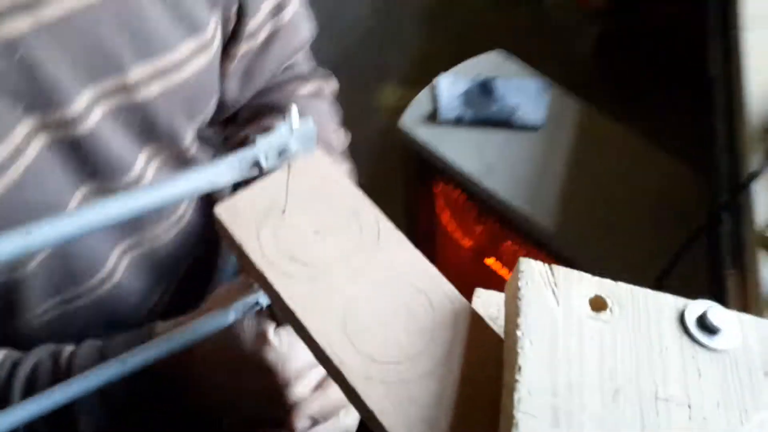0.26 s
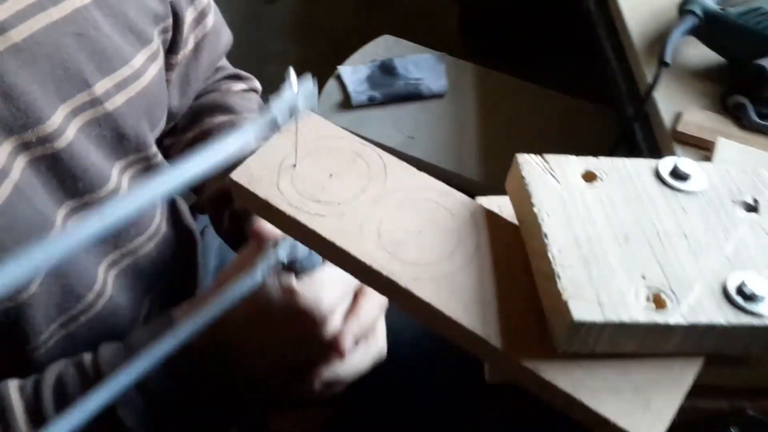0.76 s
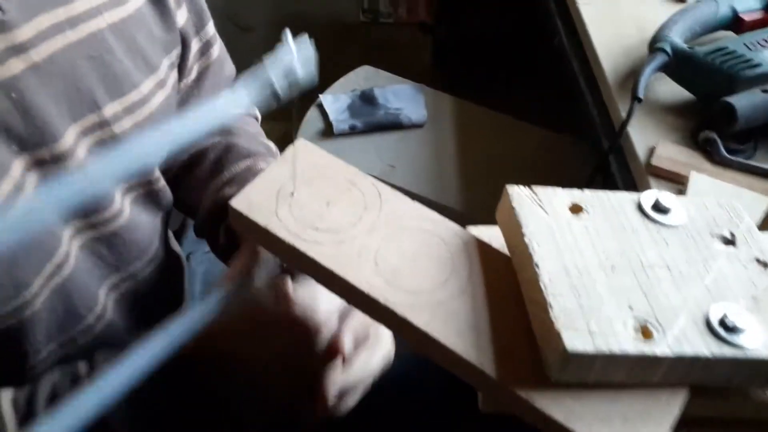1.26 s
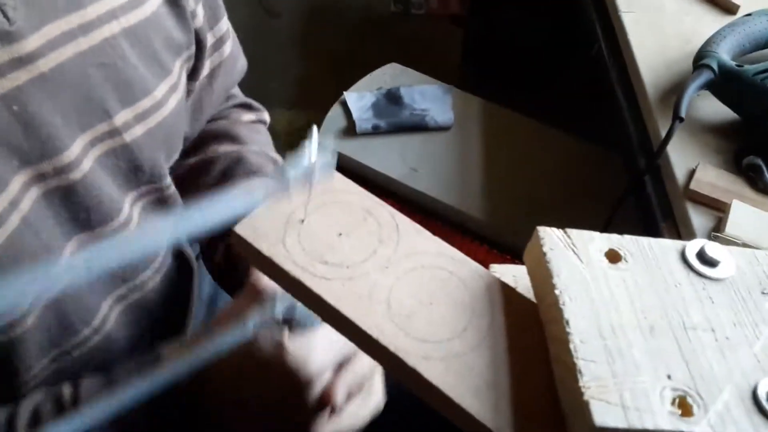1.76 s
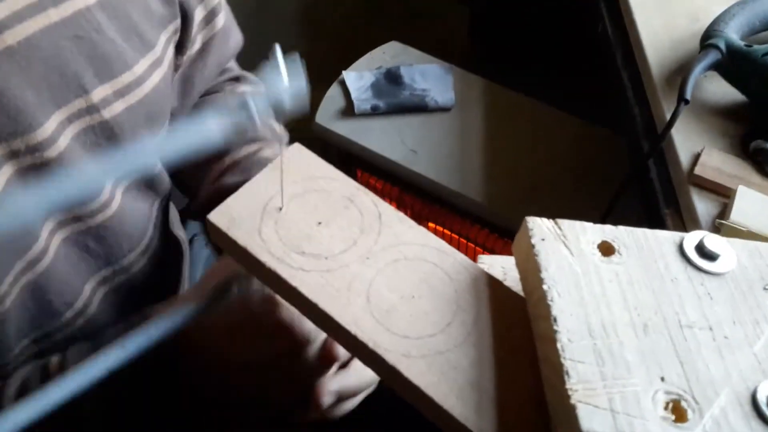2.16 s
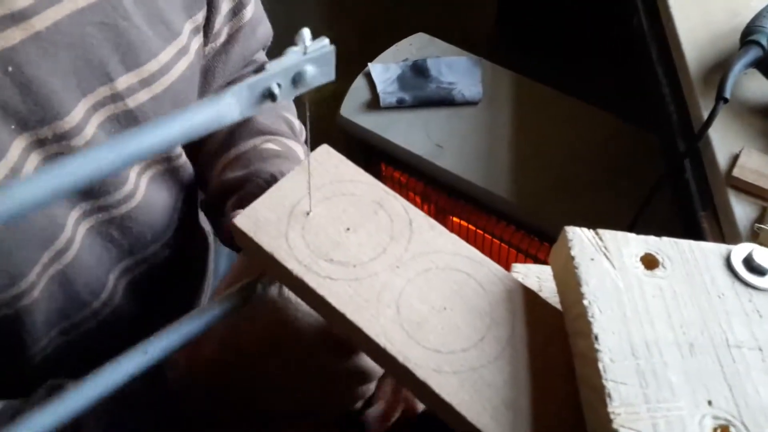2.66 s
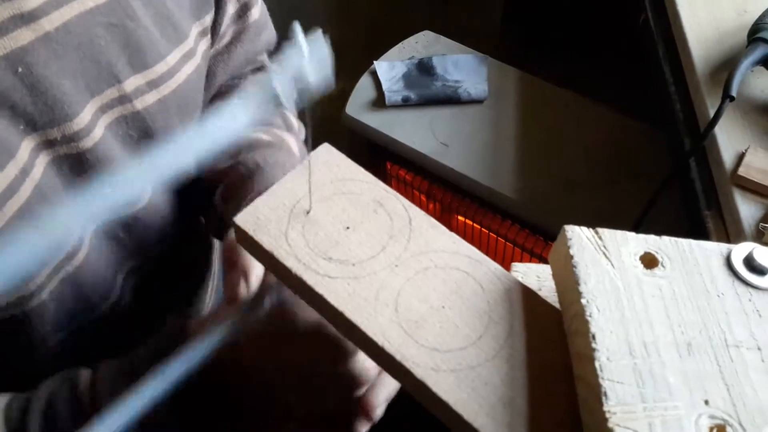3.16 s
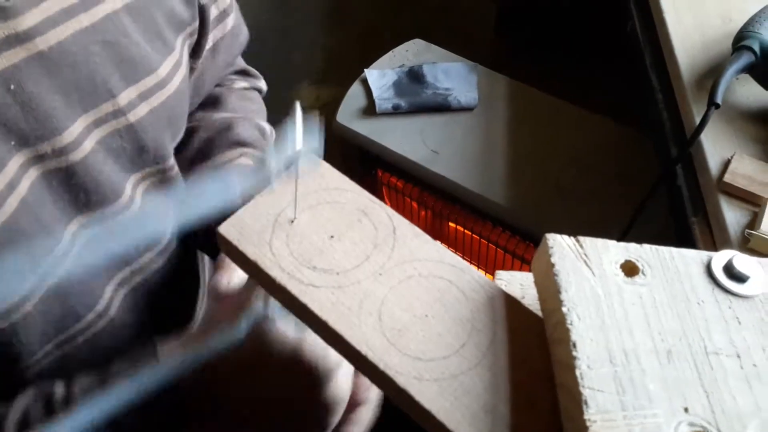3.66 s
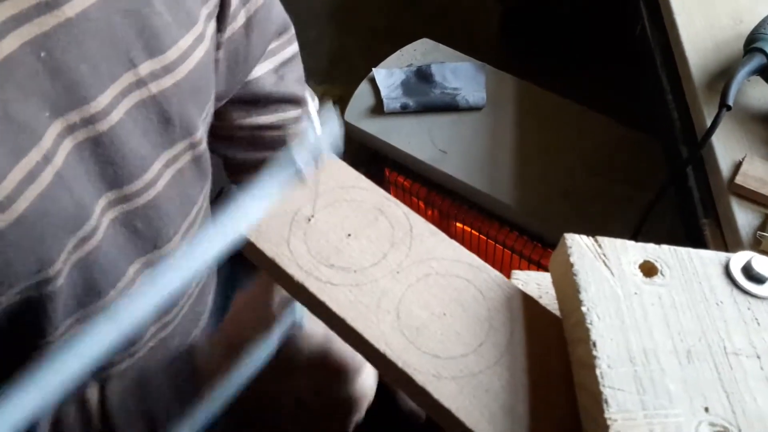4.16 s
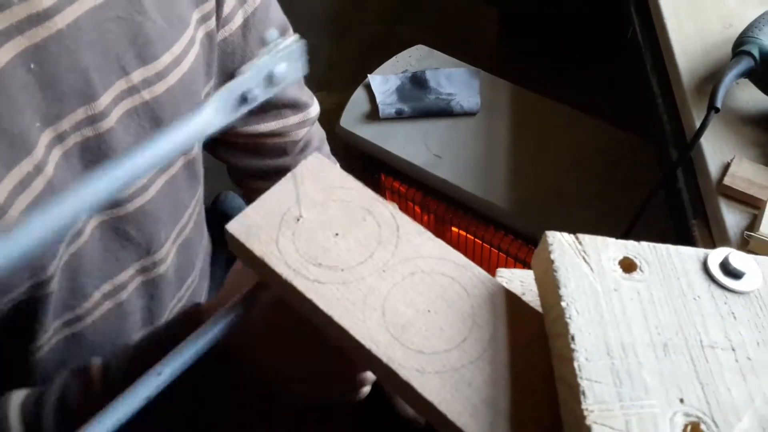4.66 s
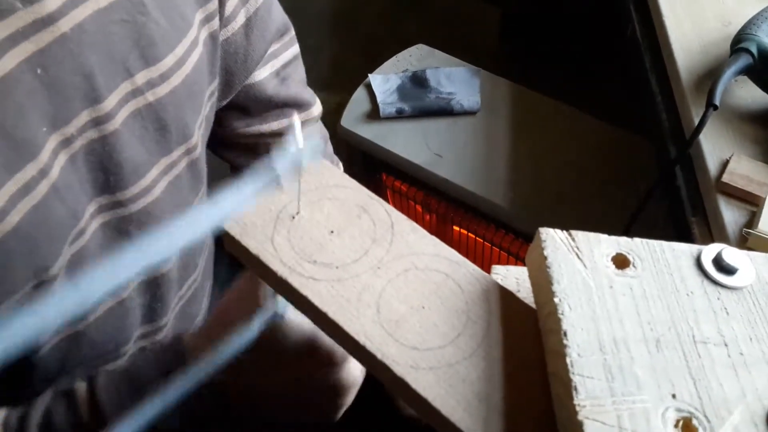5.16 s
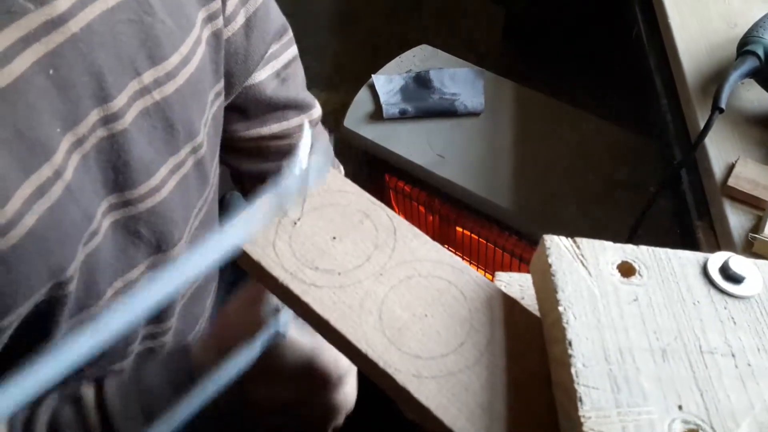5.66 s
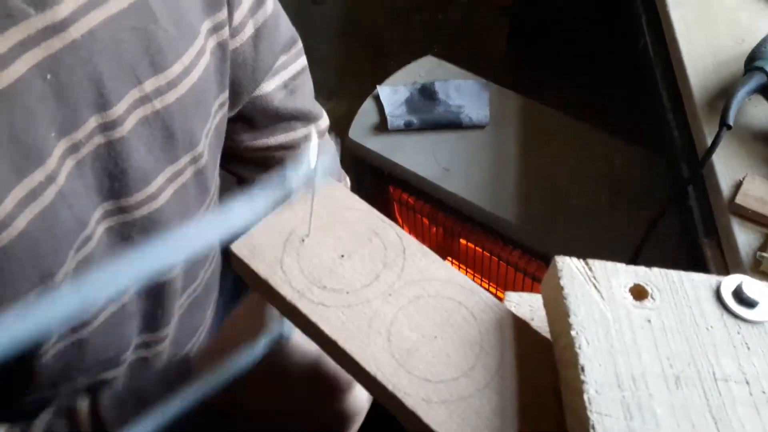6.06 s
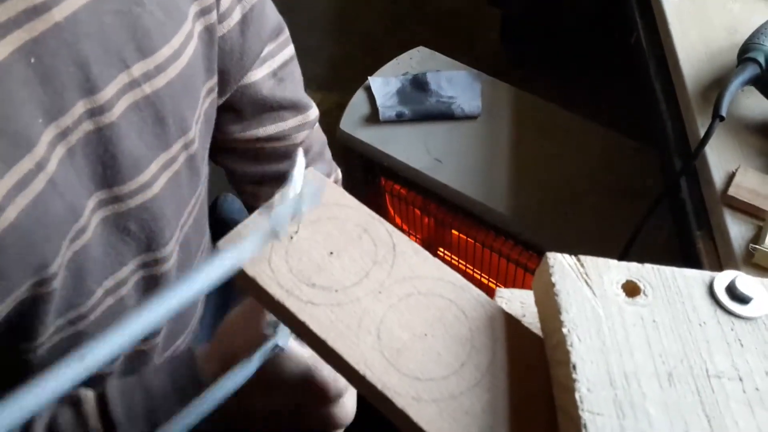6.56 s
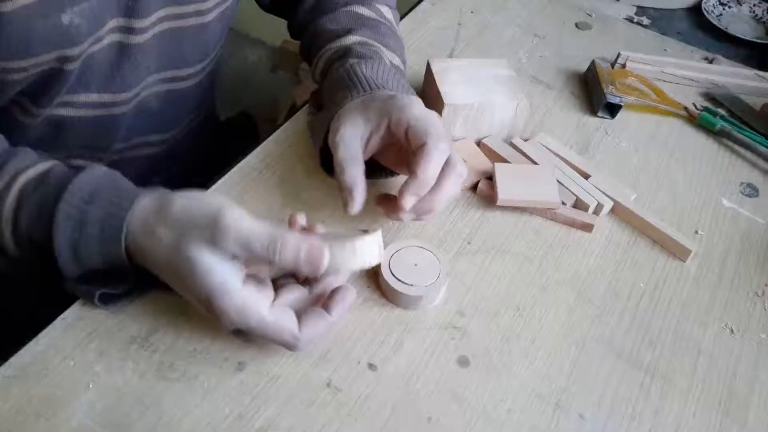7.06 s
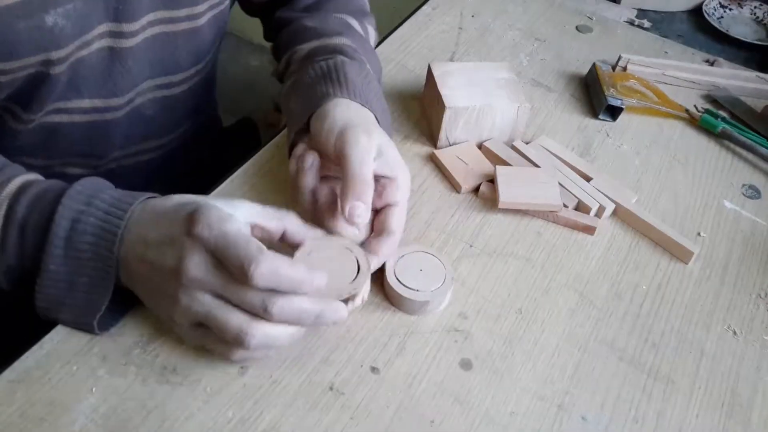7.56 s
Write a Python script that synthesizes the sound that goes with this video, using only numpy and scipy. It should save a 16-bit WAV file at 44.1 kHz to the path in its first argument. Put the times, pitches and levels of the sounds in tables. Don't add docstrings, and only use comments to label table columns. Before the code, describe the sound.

Close, fairly dry sound of a fine-toothed handsaw in thin board clamped to a bench: a quiet low bump and rustle first, then about three double strokes per second, gritty and mid-bright with a metallic whizz and low bench rumble. Occasional knocks and brief toothy tones break the rhythm. The sawing ends abruptly, followed by near silence and a faint room with tiny part clicks.

```python
import sys
import numpy as np
from scipy import signal
from scipy.io import wavfile
from scipy.ndimage import uniform_filter1d

SR = 44100
rng = np.random.default_rng(int(sys.argv[2]) if len(sys.argv) > 2 else 0)


def invert_db(level):
    return 10 ** (np.asarray(level, dtype=float) / 20)


def int16_out(signal):
    q = np.round(np.clip(np.atleast_2d(signal).T, -1, 1) * 32767)
    wavfile.write(sys.argv[1], SR, q.astype(np.int16))


N = 343891
T = np.arange(N) / SR

# start_s, length_s, bite_db, speed_db
CUTS = [(0.455, 0.1, -48, -88), (0.879, 0.24, -33.0, -53.5), (1.212, 0.19, -31.0, -51.5),
        (1.56, 0.18, -30.0, -48.5), (1.881, 0.19, -28, -46.5), (2.224, 0.19, -28.5, -45.5),
        (2.552, 0.18, -26.5, -44.5), (3.11, 0.19, -27.0, -48), (3.453, 0.18, -29, -43.5),
        (3.783, 0.17, -27.5, -41), (4.075, 0.22, -28.0, -44.5), (4.408, 0.18, -29.5, -44),
        (4.716, 0.16, -28.5, -45), (5.006, 0.172, -26.5, -44.5), (5.304, 0.17, -29.0, -44.5),
        (5.588, 0.17, -31.0, -45), (5.88, 0.18, -27, -41.5), (6.183, 0.18, -27.5, -42.5),
        (6.468, 0.2, -30.5, -45.5), (6.786, 0.16, -27.5, -44)]
# start_s, length_s, bite_db, speed_db
RETURNS = [(0.669, 0.24, -41.5, -75.5), (0.967, 0.307, -42.0, -58), (1.331, 0.25, -40, -59.5),
           (1.658, 0.25, -41.0, -55.5), (1.967, 0.3, -37, -55.5), (2.349, 0.21, -38, -50),
           (2.673, 0.25, -35.0, -52), (3.222, 0.27, -38.0, -53.5), (3.579, 0.208, -35, -51),
           (3.809, 0.26, -50.0, -59.5), (4.231, 0.19, -36.5, -51.5), (4.514, 0.2, -34.5, -55.0),
           (4.826, 0.17, -36, -51), (5.116, 0.205, -39, -50), (5.409, 0.2, -33.5, -51.5),
           (5.699, 0.22, -34, -55), (6.008, 0.18, -35.0, -47.5), (6.307, 0.2, -39, -48),
           (6.61, 0.16, -32.0, -50), (6.9, 0.19, -33.5, -49.0)]
# time_s, level_db
BOARD_LOOSENESS = [(.49, -47), (.5, -35), (.54, -33), (.6, -47), (.74, -44), (.77, -32), (1.0, -34.5),
                   (1.4, -33.5), (1.85, -38.5), (2.05, -34.5), (2.75, -32.5), (2.92, -36), (3.09, -56),
                   (3.16, -32), (4.0, -36.5), (4.3, -34), (5.2, -36.5), (6.3, -32.5)]
# pitch_hz, width_hz, level_db
BENCH_MODES = [(65, 13, -16), (77.3, 6, 12), (103, 160, 4)]
# pitch_hz, width_hz, level_db
BOARD_MODES = [(145.4, 44, 0), (159.6, 30, -0.5), (200, 26, 1), (230, 18, 2), (288, 20.7, -0.5),
               (359.6, 29, -3), (369, 6.1, -2), (451.3, 21, -1.5), (587.6, 49, -3.5), (619, 50, -9.5),
               (720, 130, -13), (837, 22, -13.5), (922, 56, -16.5)]
# pitch_hz, width_hz, level_db
FRAME_MODES = [(1120.4, 60, -9), (1250, 140, -8.5), (1434, 130, -14.5), (1681, 44, -10), (1788.6, 34, -4),
               (1891, 101, -4), (1985.4, 36, 0), (2167, 250, -18), (2341, 91, -13), (2817, 540, -35),
               (3000, 120, -36)]
# pitch_hz, width_hz, level_db
BLADE_MODES = [(3365, 320, 2.5), (3964, 270, 10.5), (4354, 300, -1.5), (4620, 67, -27.5),
               (4970, 160, -21.5), (6232, 270, -2), (7250, 230, -21), (7496, 220, -11), (8750, 900, -32.5)]
# start_s, length_s, first_rate_hz, last_rate_hz, level_db
CHATTER = [(0.966, 0.11, 339, 344, -30.5), (1.293, 0.073, 458, 462, -27), (1.976, 0.115, 698.4, 230, -28.5),
           (2.651, 0.052, 658.5, 511, -25), (3.222, 0.064, 463, 460, -33.5), (3.346, 0.053, 543, 568, -30),
           (3.549, 0.057, 579, 602, -32.5), (3.672, 0.099, 556, 439, -33),
           (4.314, 0.073, 558, 574.5, -30.5), (4.472, 0.049, 303.2, 287.8, -24.5),
           (4.789, 0.033, 569, 588.6, -32.5), (5.019, 0.039, 180.6, 188, -27.5),
           (5.078, 0.058, 720, 720, -34), (5.369, 0.048, 454, 601, -28.5),
           (5.693, 0.047, 445.8, 453.3, -24.5), (6.062, 0.097, 286.2, 290.5, -31),
           (6.36, 0.12, 289.5, 240.3, -32), (6.499, 0.13, 307.7, 200, -29.5), (6.874, 0.045, 607, 540, -23)]
# start_s, crack_db, rattle_db, thud_db
KNOCKS = [(0.088, -58, -54, -52), (.161, -54, -32.5, -15), (.196, -51, -35, -24.5), (0.541, -43, -46, -34),
          (.575, -40, -44, -27.5), (1.213, -53, -38, -23), (2.216, -50, -40, -29), (2.533, -30, -21.5, -18),
          (3.417, -12.5, -18, -14.5), (4.0472, 4, -4.5, -10), (4.9773, -26, -18.5, -21),
          (5.5767, -22, -15, -16), (5.862, -12.5, -14.5, -15.5)]
# time_s, level_db
HANDS_LEVEL = [
    (0.0, -40.5),
    (.094, -43.5),
    (.11, -44),
    (.27, -46),
    (.345, -48),
    (.485, -51.5),
    (.51, -37.5),
    (.66, -46),
    (.735, -58),
]
# pitch_hz, density_db per Hz
HANDS_COLOUR = [(35, -43.5), (150, 0.5), (406, -12), (450, 0.5), (711, -18.5), (1170, -11), (8610, -59.5),
                (18900, -120)]
# pitch_hz, t60_s
ROOM_DECAY = [(120, 0.23), (320, 0.34), (840, 0.54), (2200, 0.26), (5000, 0.11)]
# pitch_hz, density_db per Hz
AIR_COLOUR = [(40, -18.5), (147, 6), (433, -18.5), (831, -15.5), (1830, -21.5), (5250, -30), (6880, -37.5),
              (14400, -49.5)]
# pitch_hz, density_db per Hz
QUIET_COLOUR = [(30, -9.5), (103, 3), (514, -5), (1940, -12.5), (4990, -33.5), (6180, -41), (8610, -40),
                (14400, -59)]
# start_s, peak_db
TICKS = [
    (.0875, -46),
    (.542, -33),
    (.576, -34),
    (.925, -50),
    (7.564, -60),
    (7.5867, -60),
    (7.6386, -62),
    (7.7444, -54),
    (7.7894, -57),
]

CUT_LEAN, RETURN_LEAN = 1.15, 1.31
BITE_ARCH, SPEED_ARCH = 1.8, 2.67
CATCH_S, CATCH_RISE_S, JOLT_S = .04, .012, .015
BOARD_FOLLOWS, BOARD_LAG_S = 0.22, 0.01
BENCH_IDLE_DB, BENCH_FOLLOWS = -54, 0.99
SHOVE_DB, SHOVE_S = -17, .05
BUMP_DB, BUMP_S = -30, 0.02
RING_LONGEST, RING_GROWS = 1.46, .2
AIR_DB, MIC_LOW_HZ = -54, 46
STOP_S, STOP_FADE_S = 7.0688, .001
FADE_FROM_S, FADE_S, FADE_TOP_DB, FADE_BEND = 7.48, .32, -53, 1.15
OFFSET = -.0007


def saw():
    cut_bite, cut_speed = strokes(CUTS, CUT_LEAN, slack_db=-6, jolt_db=-14)
    back_bite, back_speed = strokes(RETURNS, RETURN_LEAN, slack_db=0, jolt_db=-80)
    rasp, whizz = cut_bite + back_bite, cut_speed + back_speed
    drive = teeth(10 * np.log10(rasp + 1e-8), uneven=.15, scrape=0.65, lumpy_db=1.0)
    loose_db = np.interp(T, *np.transpose(BOARD_LOOSENESS), left=-120)

    frame = ringing(drive * np.sqrt(rasp) * invert_db(0.5), FRAME_MODES, patchy_db=3.5, per_s=13)
    blade = ringing(drive * np.sqrt(whizz) * invert_db(-2.0), BLADE_MODES, patchy_db=4.0, per_s=6.8, order=2)
    fibres = band(drive * np.sqrt(rasp), 600, 2552)
    felt_db = 10 * np.log10(smoothed(rasp, BOARD_LAG_S) + 1e-6) + 35
    board_db = loose_db + BOARD_FOLLOWS * felt_db
    board = ringing(drive * invert_db(board_db + 2.0), BOARD_MODES, patchy_db=4.5, per_s=17)
    bench = bench_rumble(loose_db, cut_bite)
    return band(frame, 800, 3200) + fibres + blade + band(board, 51, 1100) + bench


def strokes(rows, lean, slack_db, jolt_db):
    bite, speed = np.zeros((2, N))
    for s, length, bite_db, speed_db in rows:
        t = np.arange(0, length, 1 / SR)
        arch = np.sin(np.pi * (t / length) ** lean)
        caught = np.clip((t - CATCH_S) / CATCH_RISE_S + .5, 0, 1)
        grip = invert_db(slack_db * (1 - caught))
        jolt = caught * invert_db(jolt_db) * np.exp(-abs(t - CATCH_S) / JOLT_S)
        add(bite, s, (invert_db(bite_db) * (grip * arch ** BITE_ARCH + jolt)) ** 2)
        add(speed, s, (invert_db(speed_db) * grip * arch ** SPEED_ARCH) ** 2)
    return bite, speed


def teeth(rasp_db, uneven, scrape, lumpy_db):
    even_rate = 520 * invert_db(.25 * (rasp_db + 34))
    bites_per_s = np.clip(even_rate * (1 + uneven * wander(60)), 50, 900)
    count = np.floor(np.cumsum(bites_per_s) / SR)
    bites = (np.diff(count, prepend=0) > 0) * invert_db(5.5 * rng.standard_normal(N))
    drive = (1 - scrape) * evened(bites) + scrape * rng.standard_normal(N)
    return evened(drive * invert_db(lumpy_db * wander(41)))


def ringing(x, modes, patchy_db, per_s, order=1):
    drift = rng.standard_normal((N // 441 + 2, len(modes)))
    drift = uniform_filter1d(drift, max(round(SR / 441 / per_s), 1), 0)
    out, power = np.zeros(N), 0
    for k, (hz, width, db) in enumerate(modes):
        r = np.exp(-np.pi * width / SR)
        pole = [1 - r, 0, r - 1, 1, -2 * r * np.cos(2 * np.pi * hz / SR), r * r]
        strength = np.interp(T * SR / 441, np.arange(len(drift)), np.tanh(evened(drift[:, k])))
        mode = signal.sosfilt([pole] * order, x * invert_db(patchy_db * strength))
        out += (-1) ** k * invert_db(db) * mode
        power += invert_db(2 * db) * width * np.pi / SR / order
    return out / np.sqrt(power)


def bench_rumble(loose_db, cut_bite):
    t, bumps = T[:SR // 2], np.zeros(N)
    for s, _, _, thud_db in KNOCKS:
        add(bumps, s, invert_db(2 * (thud_db + BUMP_DB)) * t / BUMP_S * np.exp(1 - t / BUMP_S))
    idle = invert_db(2 * (BENCH_IDLE_DB + BENCH_FOLLOWS * (np.maximum(loose_db, -70) + 42.5)))
    shoves = invert_db(2 * SHOVE_DB) * smoothed(cut_bite, SHOVE_S)
    rumble = rng.standard_normal(N) * np.sqrt(idle + shoves + bumps)
    return band(ringing(rumble, BENCH_MODES, patchy_db=-9.5, per_s=7.8, order=2), 55, 150)


def chatter():
    out, waver = np.zeros(N), wander(65)
    for s, length, first_hz, last_hz, db in CHATTER:
        count = round(length * SR)
        shake = waver[round(s * SR):][:count]
        pitch_hz = np.geomspace(first_hz, last_hz, count) * (1 + 0.031 * shake)
        turn = 2 * np.pi * np.cumsum(pitch_hz) / SR
        tone = np.sin(turn) + 0.28 * np.sin(2 * turn)
        shake_db = 2.3 + 3.5 * abs(np.log(last_hz / first_hz))
        level = invert_db(db + 0.7 + shake_db * shake)
        add(out, s, level * tone * signal.windows.tukey(count, .6))
    return out


def knocks():
    out, t = np.zeros(N), T[:SR // 2]
    rattles = rng.standard_normal((len(KNOCKS), 4, len(t)))
    wood_body, thud_body = body(BOARD_MODES[7:] + FRAME_MODES[:1]), body(BOARD_MODES[1:10])
    for (s, crack_db, rattle_db, thud_db), (a, b, c, d) in zip(KNOCKS, rattles):
        u = t / (RING_LONGEST * invert_db(RING_GROWS * rattle_db))
        snap = (1 + 0.43 * a) * np.sign(np.cos(2 * np.pi * 1900 * t)) * np.exp(-t / 0.0013)
        crack = band(snap, 900, 2800) + .45 * band(a * np.exp(-t / .002), 2300, 4200)
        low_rattle = band(band(d * np.exp(-u / 0.018), 800, 2300), 800, 2300)
        high_rattle = band(d * np.exp(-u / 0.022), 2300, 3900)
        rattle = low_rattle + 0.73 * invert_db(2.0 * rattle_db) * high_rattle
        wood = signal.oaconvolve(b * np.exp(-u / 0.017), wood_body)[:len(t)]
        swell = np.exp(-u / 0.044) * (1 - np.exp(-u / 0.004))
        thud = signal.oaconvolve(c * swell, thud_body)[:len(t)]
        wood_db = (rattle_db + thud_db) / 2 + 2
        parts = [(crack, crack_db), (rattle, rattle_db), (wood, wood_db), (thud, thud_db)]
        add(out, s, sum(invert_db(db) * x / abs(x).max() for x, db in parts))
    cushioned = .8 * np.tanh(out / .8)
    return signal.sosfilt(signal.butter(8, 4700, fs=SR, output="sos"), cushioned)


def body(modes):
    t = T[:SR // 4]
    ring = np.zeros(len(t))
    for k, (hz, width, db) in enumerate(modes):
        ring += (-1) ** k * invert_db(db) * width * np.exp(-np.pi * width * t) * np.sin(2 * np.pi * hz * t)
    return ring / np.linalg.norm(ring)


def hands():
    level_db = np.interp(T, *np.transpose(HANDS_LEVEL), right=-120) - 3
    return invert_db(level_db) * hiss(HANDS_COLOUR, patchy_db=1.5)


def room(x):
    taps = np.zeros(SR)
    at = np.arange(100, SR - 20, 20)
    taps[at + rng.integers(0, 20, len(at))] = rng.choice([-1., 1.], len(at))
    hz, t, z = signal.stft(taps, SR, nperseg=256)
    t60 = np.clip(read(ROOM_DECAY, hz), .03, 2)[:, None]
    tail = signal.istft(z * invert_db(-60 * t / t60), SR, nperseg=256)[1]
    return signal.fftconvolve(x, tail / np.linalg.norm(tail))[:N]


def later():
    fade = np.clip((T - FADE_FROM_S) / FADE_S, 0, 1) ** FADE_BEND
    out = invert_db(FADE_TOP_DB) * fade * hiss(QUIET_COLOUR, patchy_db=2.0)
    for (s, db), snap in zip(TICKS, rng.standard_normal((len(TICKS), 400))):
        tick = band(smoothed(snap * np.exp(-T[:400] / .0014), 1e-4), 900, 4400)
        add(out, s, invert_db(db) * tick / abs(tick).max())
    return out


def hiss(spectrum, patchy_db):
    frames, hz = N // 256 + 5, np.fft.rfftfreq(1024, 1 / SR)
    a, b, patches = rng.standard_normal((frames, 513, 3)).T
    patches = evened(uniform_filter1d(uniform_filter1d(patches, 10, 0), 10, 1))
    level = invert_db(read(spectrum, hz)[:, None] + patchy_db * patches)
    return evened(signal.istft((a + 1j * b) * level, nperseg=1024, noverlap=768)[1][:N])


def wander(below_hz):
    return evened(signal.sosfilt(signal.butter(2, below_hz, fs=SR, output="sos"), rng.standard_normal(N)))


def band(x, lo_hz, hi_hz):
    return signal.sosfilt(signal.butter(3, [lo_hz, hi_hz], "bandpass", fs=SR, output="sos"), x)


def smoothed(x, s):
    r = np.exp(-1 / (abs(s) * SR + 1))
    return signal.lfilter([1 - r], [1, -r], x)


def evened(x):
    return x / np.sqrt(np.mean(x ** 2) + 1e-20)


def read(points, hz):
    f, value = np.transpose(points)
    return np.interp(np.log(hz + 1), np.log(f + 1), value)


def add(mix, s, sound):
    part = mix[round(s * SR):][:len(sound)]
    part += sound[:len(part)]


def until_stop():
    return np.clip((STOP_S - T) / STOP_FADE_S, 0, 1)


def scene():
    sawing, blows = saw() + chatter(), knocks()
    echoes = room(invert_db(-12.5) * sawing + invert_db(-16.0) * blows)
    air = invert_db(AIR_DB) * hiss(AIR_COLOUR, patchy_db=1.0)
    work = sawing + blows + echoes + hands() + air
    work = signal.sosfilt(signal.butter(3, MIC_LOW_HZ, "highpass", fs=SR, output="sos"), work)
    return (work * until_stop() + later())[None]


def top_cut(x):
    return signal.sosfilt(signal.butter(12, 14470, fs=SR, output="sos"), x)


def record(dry):
    hz, _, z = signal.stft(dry[0], SR, nperseg=2048)
    local = uniform_filter1d(abs(z) ** 2, size=12, axis=0)
    buried = (local < invert_db(2 * -69) * local.sum(0)) & (hz[:, None] > 6400)
    kept = signal.istft(np.where(buried, invert_db(-25) * z, z), SR, nperseg=2048)[1][None, :N]
    opened = until_stop() + np.clip((T - 7.43) / .37, 0, 1)
    return top_cut(kept * (opened > 0) + OFFSET * opened)


dry = scene()
out = record(dry)
int16_out(out)
```